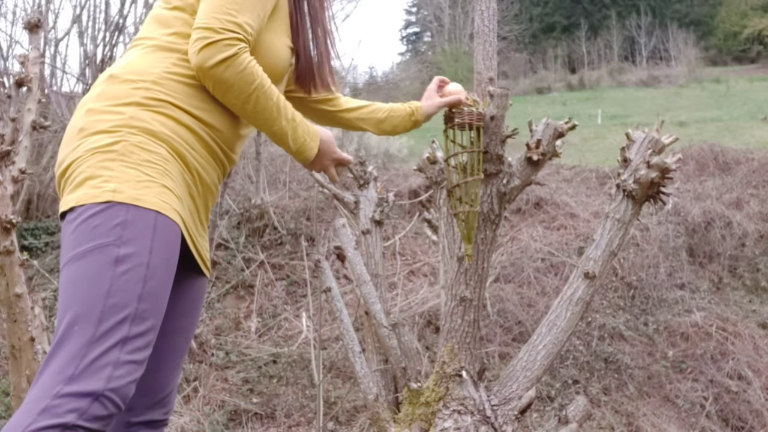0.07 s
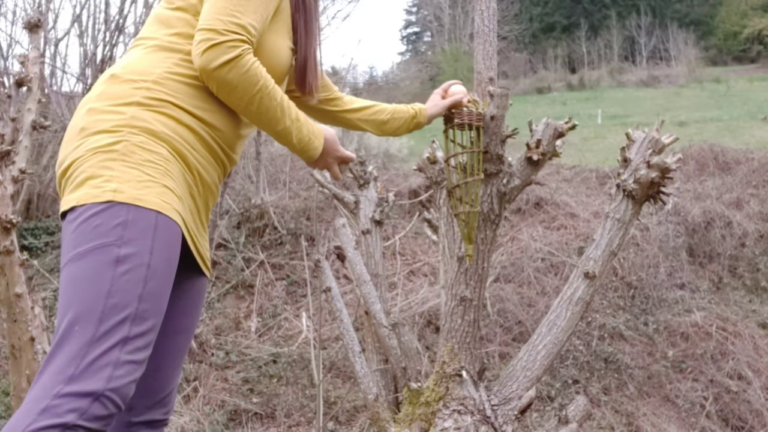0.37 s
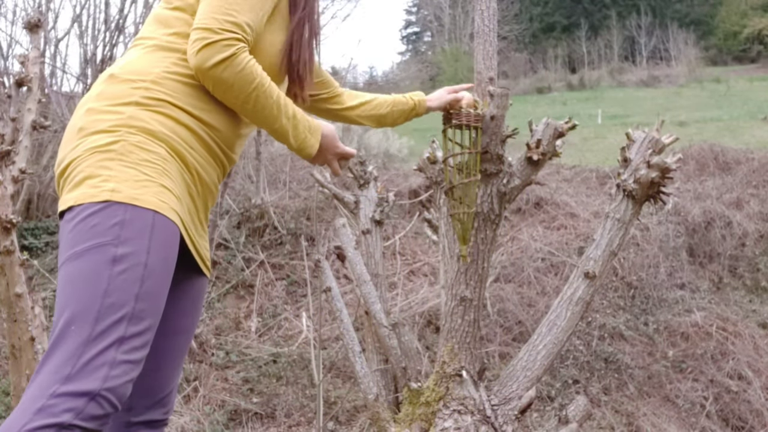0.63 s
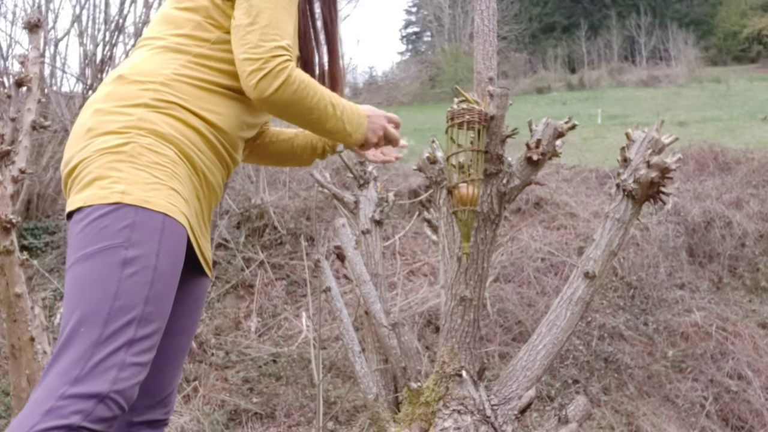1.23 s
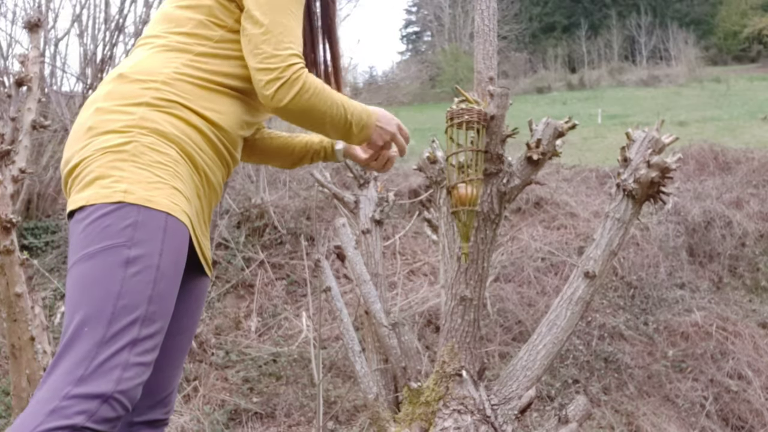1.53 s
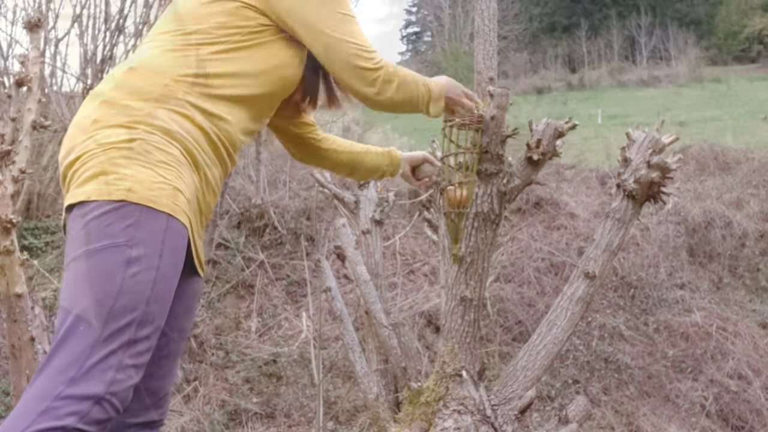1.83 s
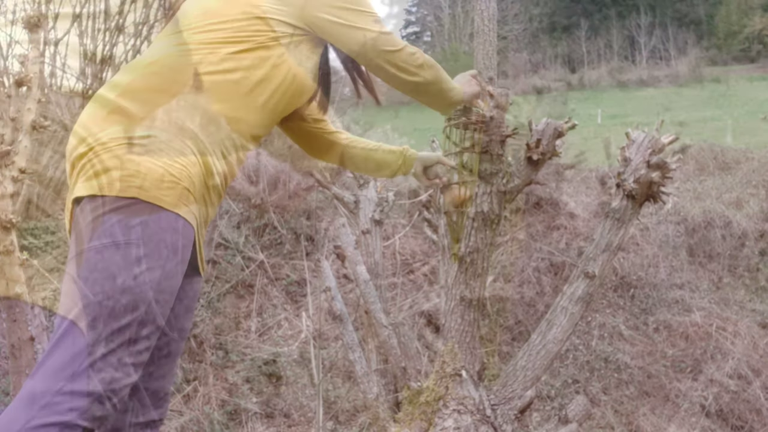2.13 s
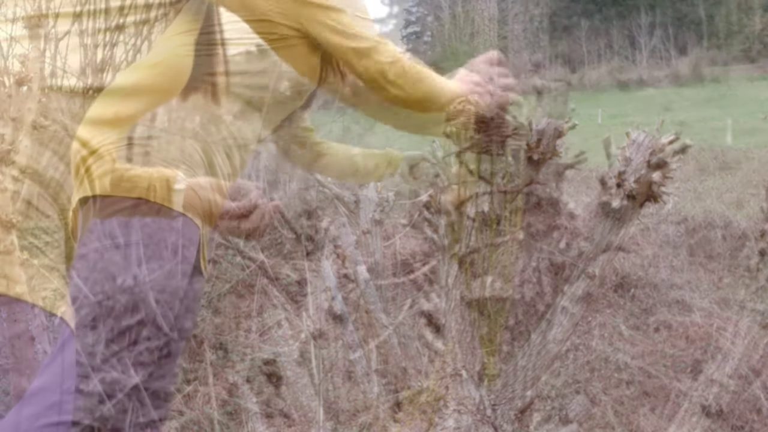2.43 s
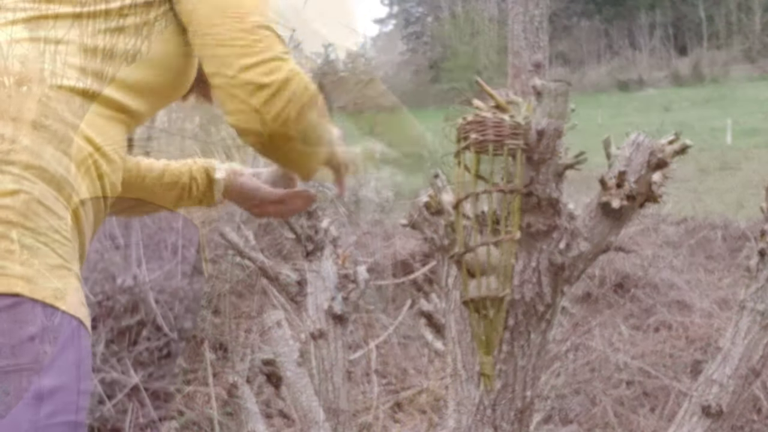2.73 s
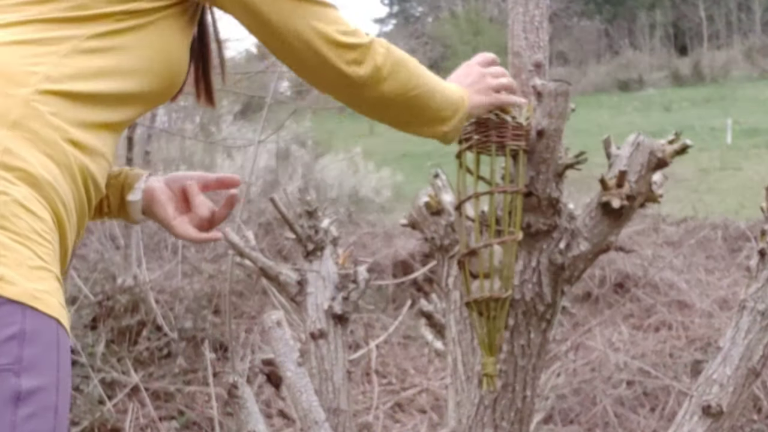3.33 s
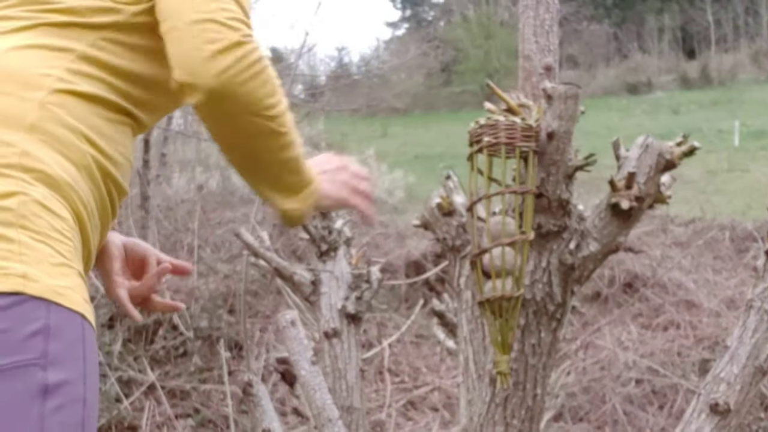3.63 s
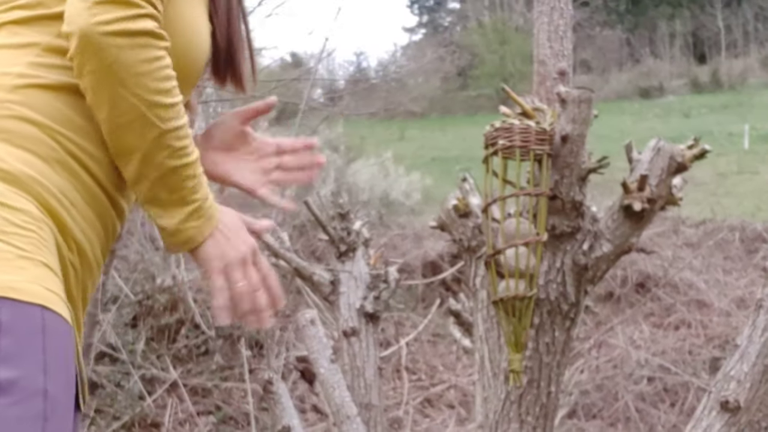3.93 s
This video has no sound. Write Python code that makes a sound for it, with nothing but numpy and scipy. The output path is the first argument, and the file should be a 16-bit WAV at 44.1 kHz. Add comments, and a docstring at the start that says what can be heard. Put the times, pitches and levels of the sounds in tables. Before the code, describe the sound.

Gusty wind rumbles on the microphone, with faint clicks of dry twigs being handled.

```python
"""Gusts buffet a microphone outdoors: turbulent eddies press on it as rumble, flutter, slaps and pops.
Distant air and trees hiss evenly behind them, and two faint tones whistle briefly.
Dry twigs of a woven feeder tick on impact and scrape by stick-slip friction as a hand works at it.
At an abrupt cut at 3.24 s, with a soft tick, the buffeting vanishes and the hiss steps down;
a light breeze goes on."""
import sys
import numpy as np
from scipy import signal
from scipy.fft import rfft, irfft
from scipy.io import wavfile
from scipy.ndimage import uniform_filter1d

SR = 44100
rng = np.random.default_rng(int(sys.argv[2]) if len(sys.argv) > 2 else 0)


def inscribe(sig):
    """Save sig as 16-bit PCM at rate SR to the path in sys.argv[1].

    A 1-D sig is mono; a 2-D sig holds one channel per row.
    Samples are clipped to [-1, 1] before scaling.
    """
    pcm = np.round(np.clip(np.atleast_2d(sig).T, -1, 1) * 32767)
    wavfile.write(sys.argv[1], SR, pcm.astype(np.int16))


N = 176400
TIME = np.arange(N) / SR
CUT_S = 3.242


def amp(db):
    """Amplitude grows tenfold for every 20 dB."""
    return 10 ** (np.asarray(db) / 20)


def unit_rms(x):
    """Division by the root mean square gives a signal unit power."""
    return x / np.sqrt(np.mean(x ** 2) + 1e-20)


def curve(points):
    """Linear interpolation joins (time, value) points."""
    return np.interp(TIME, *np.transpose(points))


def gain_at(spectrum, hz):
    """Interpolation of a spectrum in dB over log frequency gives the gain at each frequency."""
    frequencies, db = np.transpose(spectrum)
    return amp(np.interp(np.log(hz + 1), np.log(frequencies + 1), db))


def add(mix, start_s, sound):
    """Superposition: a sound sums into the mix from its start time."""
    part = mix[max(round(start_s * SR), 0):][:len(sound)]
    part += sound[:len(part)]


def noise(spectrum):
    """Spectral weighting turns white noise into coloured noise of unit power."""
    white = rfft(rng.standard_normal(N))
    return unit_rms(irfft(white * gain_at(spectrum, np.fft.rfftfreq(N, 1 / SR)), N))


def steadied(x, span_s):
    """Division by the running rms removes the slow chance swings of a noise."""
    size = int(span_s * SR)
    power = uniform_filter1d(uniform_filter1d(x ** 2, size), size)
    return x / np.sqrt(abs(power) + 1e-6)


def coloured(x, spectrum, size=1024):
    """A minimum-phase filter of unit energy rings only after it is excited."""
    log_gain = np.log(gain_at(spectrum, abs(np.fft.fftfreq(size, 1 / SR))))
    taps = np.fft.ifft(np.exp(np.conj(signal.hilbert(log_gain)))).real
    return signal.oaconvolve(x, taps / np.linalg.norm(taps))[:N]


# Gust strength, extra flutter and breeze strength. Each row: time in seconds, relative level in dB.
GUST_LEVEL = [(0.0, -51), (0.06, -30), (0.15, -51), (0.32, -32), (0.36, -43), (0.39, -30), (0.53, -15),
              (0.56, -19), (0.59, -11), (0.63, -20), (0.94, -15), (1.01, -8), (1.05, -18), (1.17, -10),
              (1.22, -22), (1.27, -28), (1.34, -9), (1.38, -14), (1.4, -21), (1.43, -15), (1.51, -24),
              (1.54, -19), (1.57, -26), (1.67, -13), (1.76, -20), (1.81, -35), (1.96, -33), (2.05, -14),
              (2.12, -11), (2.16, -17), (2.23, -8), (2.47, -14), (2.5, -8), (2.53, -15), (2.64, -13),
              (2.67, -18), (2.69, -11), (2.83, -15), (2.95, -7), (2.98, -17), (3.0, -11), (3.04, -16),
              (3.21, -13), (3.23, -23)]
FLUTTER_EXTRA = [(0, -3), (.5, 1.5), (.75, -3), (1.1, 0), (1.35, -1.5), (1.45, 0), (1.6, -8.5), (1.8, -3.5),
                 (2.05, 1), (2.3, 2), (2.6, 1), (2.8, 3.5), (2.9, 2.5), (3.03, -5.5), (3.23, -1)]
BREEZE_LEVEL = [(0, -44), (.07, -36), (.16, -61), (.35, -29.5), (3.25, -50), (3.5, -38.5), (3.66, -56),
                (3.84, -35.5), (4, -50)]
# Large eddies, small eddies and the breeze. Each row: frequency in Hz, relative spectral density in dB.
RUMBLE_SPECTRUM = [(10, -52), (25, -22), (38, -7), (55, -3), (76, 0.5), (100, -1.5), (135, -3),
                   (180, -12.5), (230, -23), (320, -31), (450, -56), (800, -78), (2000, -90)]
FLUTTER_SPECTRUM = [(70, -25), (135, 5.5), (170, 6), (215, 1.5), (260, -2), (315, -1), (360, -16.5),
                    (520, -24.5), (750, -33), (1300, -50), (4000, -65)]
BREEZE_SPECTRUM = [(15, -48), (35, -2), (55, -5), (75, 6), (100, -11), (160, -16), (400, -53)]


def buffeting(strong_db=-12, flutter_growth=1.24, stop_s=.004):
    """Turbulent pressure: large eddies rumble, small ones flutter and grow faster with the wind."""
    gust_db = curve(GUST_LEVEL)
    flutter_db = strong_db - 7 + curve(FLUTTER_EXTRA) + flutter_growth * (gust_db - strong_db)
    rumble = steadied(noise(RUMBLE_SPECTRUM), span_s=.037) * amp(gust_db - 1)
    flutter = steadied(noise(FLUTTER_SPECTRUM), span_s=.045) * amp(flutter_db)
    breeze = noise(BREEZE_SPECTRUM) * amp(curve(BREEZE_LEVEL))
    before_cut = np.clip((CUT_S - TIME) / stop_s, 0, 1)
    return before_cut * (rumble + flutter) + breeze


def hiss(spectrum, patchy_db=1.0):
    """Random amplitude modulation spreads soft patches over the time and frequency of a noise."""
    _, _, bands = signal.stft(noise(spectrum), SR, nperseg=1024, noverlap=768)
    patches = uniform_filter1d(rng.standard_normal(bands.shape), size=12, axis=0)
    patches = unit_rms(uniform_filter1d(patches, size=14, axis=1))
    _, patchy = signal.istft(bands * amp(patchy_db * patches), nperseg=1024, noverlap=768)
    return unit_rms(patchy[:N])


# Hiss before and after the cut. Each row: frequency in Hz, relative spectral density in dB.
BEFORE_CUT_SPECTRUM = [(20, -23), (60, -7), (150, -13), (350, 5), (600, -2.5), (1200, -4.5), (2200, -8.5),
                       (3300, -11), (4600, -13), (6600, -17.5), (8300, -18), (9600, -23), (12300, -21),
                       (16000, -24.5)]
AFTER_CUT_SPECTRUM = [(20, -18), (45, -8), (75, -4), (130, -3), (200, -1.5), (320, 4), (600, -3.5),
                      (900, -6), (1500, -9.5), (2500, -12.5), (4800, -16.5), (6600, -20), (8300, -21),
                      (9600, -26), (12300, -24), (16000, -28)]
# Slow swell of each hiss. Each row: time in seconds, relative level in dB.
BEFORE_CUT_SWELL = [(0, -1), (.65, 1.5), (1.4, 0.5), (2.2, 0.5), (2.8, 0), (3.24, 0)]
AFTER_CUT_SWELL = [(3.24, -0.041), (3.5, 1), (3.7, 0.14), (4, 0.086)]


def distant_air(before_db=-35, after_db=-39.5):
    """Broadband flow noise from far-off air and trees; the hiss steps down at the cut."""
    before = hiss(BEFORE_CUT_SPECTRUM) * amp(before_db + curve(BEFORE_CUT_SWELL))
    after = hiss(AFTER_CUT_SPECTRUM) * amp(after_db + curve(AFTER_CUT_SWELL))
    return np.where(TIME < CUT_S, before, after)


# A low rising moan and a short squeak. Each row: centre in seconds, Gaussian width in seconds,
# pitch in Hz, glide in Hz per second, level in dB.
WHISTLE_TONES = [(.25, .085, 525, 350, -42), (3.222, .014, 1915, 0, -40)]


def whistles(waver_hz=14):
    """Random frequency modulation makes thin tones waver as they swell and fade."""
    out = np.zeros(N)
    for centre, width, hz, glide, db in WHISTLE_TONES:
        t = TIME - centre
        waver = waver_hz * unit_rms(uniform_filter1d(rng.standard_normal(N), size=600))
        phase = 2 * np.pi * np.cumsum(hz + glide * t + waver) / SR
        out += amp(db) * np.exp(-.5 * (t / width) ** 2) * unit_rms(np.sin(phase))
    return out


def slips(size, per_s, spread_db):
    """Stick-slip friction releases a random train of uneven impulses, here of unit power."""
    chance, strength, sign = rng.random((3, size))
    heights = amp(-spread_db * np.log(strength + .036))
    return unit_rms((chance < per_s / SR) * heights * np.sign(sign - .5))


def thinned(x, edge_hz):
    """High-pass filtering: thinner twigs radiate less of the lower treble."""
    return signal.lfilter(*signal.butter(2, edge_hz, "highpass", fs=SR), x)


# Twigs ticking. Each row: start in seconds, relative level in dB, lower band edge in Hz.
TWIG_TICKS = [(.809, -23.5, 4500), (.816, -29, 4500), (0.909, -29, 4500), (.915, -36, 4500),
              (.996, -27, 4500), (1.054, -22.5, 3000), (1.07, -22.5, 3000), (1.147, -25, 3500),
              (1.158, -31, 4500), (1.207, -28, 3500), (1.241, -18, 3000), (1.2601, -9, 5000),
              (1.2615, -29, 5000), (1.617, -32, 4500), (1.693, -39, 4500), (1.733, -33, 4500),
              (1.917, -31, 6000), (2.523, -27.5, 5000), (2.603, -32, 3000), (2.653, -38, 6500),
              (2.667, -29, 6500), (2.674, -21, 6500), (2.741, -32, 7000), (2.806, -35, 5000),
              (2.838, -30, 6000), (2.91, -32, 4000), (2.93, -32, 6000)]
# Twigs sliding over each other. Each row: start in seconds, length in seconds, relative level in dB,
# lower band edge in Hz.
TWIG_SCRAPES = [(1.046, .028, -41, 3000), (1.146, 0.0095, -39, 4000), (1.21, 0.0044, -32, 3500),
                (1.244, 0.019, -22.5, 1540), (2.602, 0.036, -39.5, 5000), (2.653, 0.019, -33.5, 6000)]
# Faint crackle of the handled feeder. Each row: start in seconds, end in seconds, relative level in dB.
TWIG_CRACKLE = [(0.452, 1.304, -48.5), (1.61, 2.2, -53), (2.502, 2.97, -50)]
# Resonances of the dry twigs. Each row: frequency in Hz, relative gain in dB.
TWIG_RESPONSE = [(300, -32), (1200, 6), (1700, -26), (2100, -1), (2700, -8), (3600, -5), (4100, -5),
                 (4700, -1.5), (6300, -7), (8100, 0.5), (10200, -7), (12000, -0.5), (14000, -6),
                 (16000, -9)]


def twigs(rise_s=.0006, decay_s=.0015, tick_tail_s=.006, scrape_tail_s=.022, size=4096):
    """Impacts and stick-slip friction excite the heavily damped resonances of dry wood."""
    force, t = np.zeros(N), np.arange(size) / SR
    decay = np.exp(-t / decay_s) + amp(-11) * np.exp(-t / tick_tail_s)
    tick_envelope = np.minimum(t / rise_s, 1) * decay
    for start, db, edge_hz in TWIG_TICKS:
        add(force, start, amp(db) * thinned(tick_envelope * rng.standard_normal(size), edge_hz))
    for start, length, db, edge_hz in TWIG_SCRAPES:
        tail = amp(-14) * np.exp(-np.maximum(t - length, 0) / scrape_tail_s)
        friction = np.where(t < length, 1, tail) * slips(size, per_s=7600, spread_db=3)
        add(force, start, amp(db) * thinned(friction, edge_hz))
    grain = tick_envelope * rng.standard_normal(size)
    crackle = unit_rms(signal.oaconvolve(slips(N, per_s=84, spread_db=2), grain)[:N])
    for start, end, db in TWIG_CRACKLE:
        add(force, start, amp(db) * crackle[int(start * SR):int(end * SR)])
    return coloured(force, TWIG_RESPONSE)


# Flurries of small eddies against the microphone. Each row: centre in seconds, level in dB,
# Gaussian width in seconds, upper band edge in Hz.
EDDY_SLAPS = [(0.52, -17, 0.0044, 228), (0.532, -31, 0.0065, 704), (.589, -16.5, 0.0065, 260),
              (0.662, -20.5, 0.005, 240), (.86, -19.5, 0.0069, 373), (.93, -19.5, 0.0027, 337),
              (1.007, -14, 0.007, 265), (1.09, -20.5, 0.016, 330), (1.134, -30, 0.021, 300),
              (1.353, -24, 0.012, 333), (1.445, -24, 0.0065, 303), (2.115, -21.5, 0.0051, 240),
              (2.325, -14.5, 0.01, 397), (2.415, -18.5, 0.015, 360), (2.57, -21, 0.017, 322),
              (2.622, -23.5, 0.017, 308), (2.693, -14, 0.0088, 333), (2.719, -15, 0.0057, 536),
              (2.89, -11.5, 0.022, 280), (2.922, -12.5, 0.0062, 350), (2.951, -17.5, 0.0065, 290),
              (3.116, -13.5, 0.0045, 327), (3.184, -11, 0.0039, 320)]


def slaps(low_edge_hz=220, rolloff_order=5.5, size=8192):
    """A passing eddy gives a puff of pressure; the smaller the eddy, the higher its band reaches."""
    out, t = np.zeros(N), (np.arange(size) - size / 2) / SR
    hz = np.fft.rfftfreq(size, 1 / SR)
    low_cut = 1 - np.exp(-(hz / low_edge_hz) ** 2)
    for centre, db, width, edge_hz in EDDY_SLAPS:
        band = low_cut / np.sqrt(1 + (hz / edge_hz) ** (2 * rolloff_order))
        envelope = np.exp(-.5 * (t / width) ** 2)
        puff = irfft(rfft(rng.standard_normal(size)) * band) * envelope
        add(out, centre + t[0], amp(db) * puff * np.linalg.norm(envelope) / np.linalg.norm(puff))
    return out


# Pops in strong gusts. Each row: centre in seconds, peak before clipping in dB, half width in seconds.
GUST_POPS = [(1.3605, -8, .0012), (2.378, 3, .0012), (2.7015, 5, .001), (2.917, -6, .0008),
             (3.18, -6, .0012)]


def pops(rounding=.5, size=2048):
    """A pressure transient of zero net impulse: a sharp spike between two shallow troughs."""
    out, t = np.zeros(N), (np.arange(size) - size / 2) / SR
    for centre, db, width in GUST_POPS:
        scaled_time = t / width
        spike = np.gradient(scaled_time * np.exp(-np.hypot(scaled_time, rounding)))
        add(out, centre + t[0], amp(db) * spike / spike.max())
    return out


# Colour of the soft tick. Each row: frequency in Hz, relative gain in dB.
SOFT_TICK_RESPONSE = [(300, -2), (2000, -2), (4000, -18), (6500, -5), (7800, -28), (16000, -41)]


def soft_tick(level_db=-25, decay_s=.0022, size=512):
    """An exponentially damped noise burst makes one dull tick at the cut."""
    force, t = np.zeros(N), np.arange(size) / SR
    burst = np.exp(-t / decay_s) * rng.standard_normal(size)
    add(force, CUT_S - .002, amp(level_db) * burst)
    return coloured(force, SOFT_TICK_RESPONSE)


def scene():
    """Superposition: the pressures of wind, far background and feeder sum in one channel."""
    return (buffeting() + distant_air() + whistles() + twigs() + slaps() + pops() + soft_tick())[None]


def record(dry, band_edge_hz=16100):
    """Overload clips the strongest pops; a low-pass filter then limits the bandwidth."""
    clipped = np.clip(dry, -1, 1)
    low_pass = signal.firwin(511, band_edge_hz, window=("kaiser", 9), fs=SR)
    return signal.oaconvolve(clipped, low_pass[None], "same")


dry = scene()
out = record(dry)
inscribe(out)
```